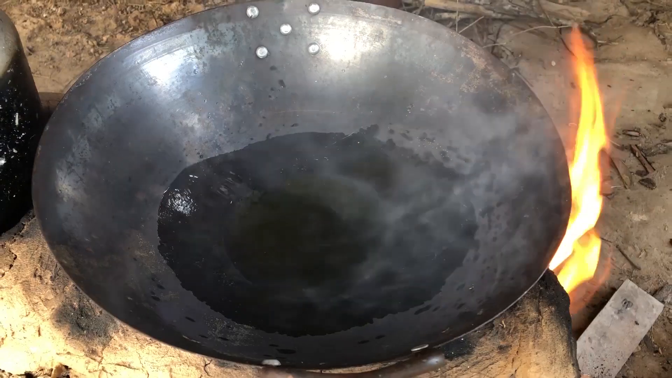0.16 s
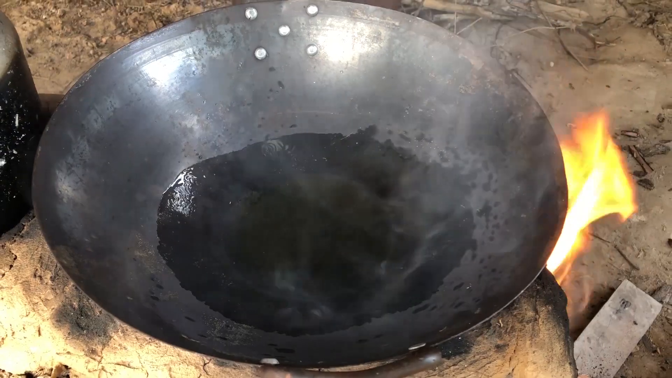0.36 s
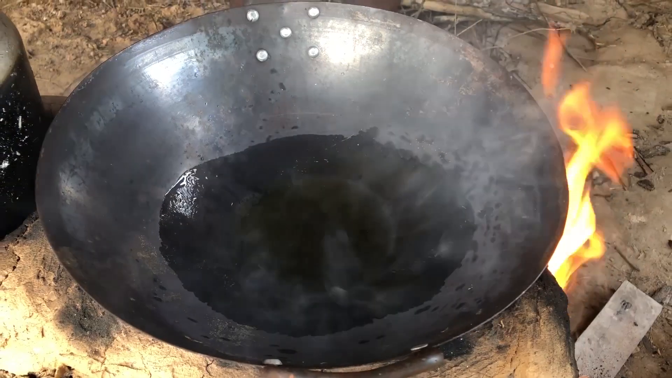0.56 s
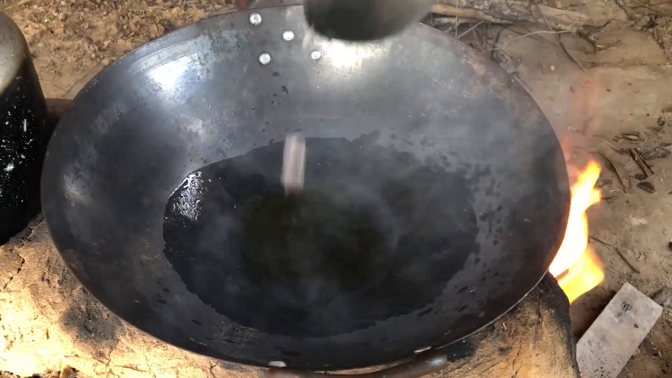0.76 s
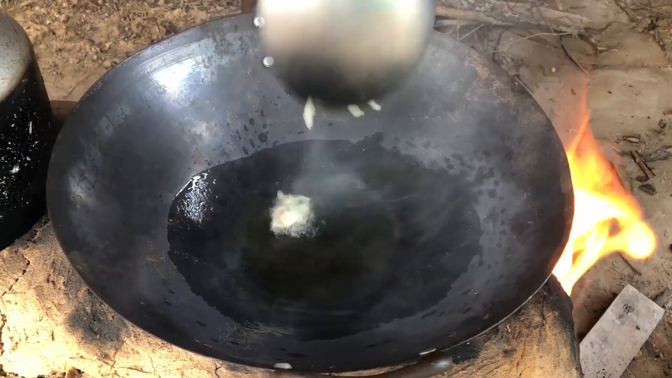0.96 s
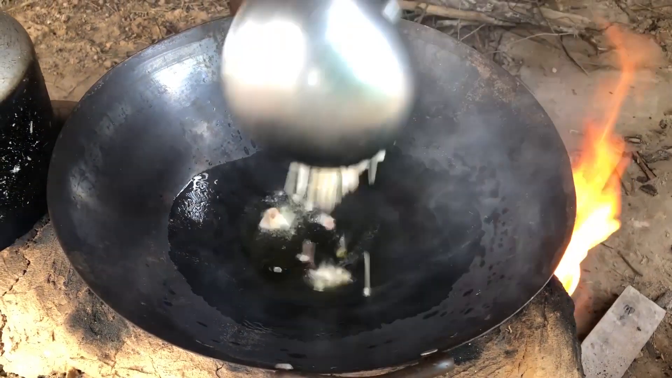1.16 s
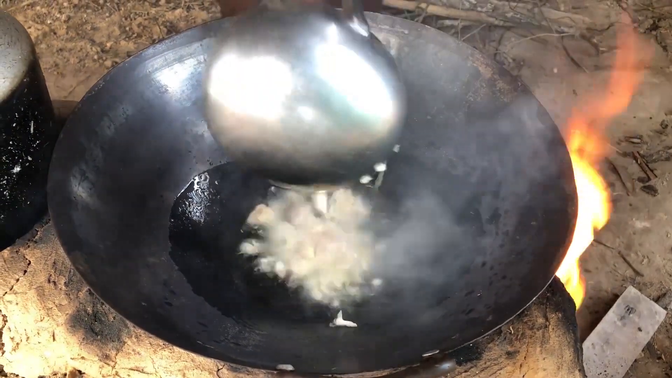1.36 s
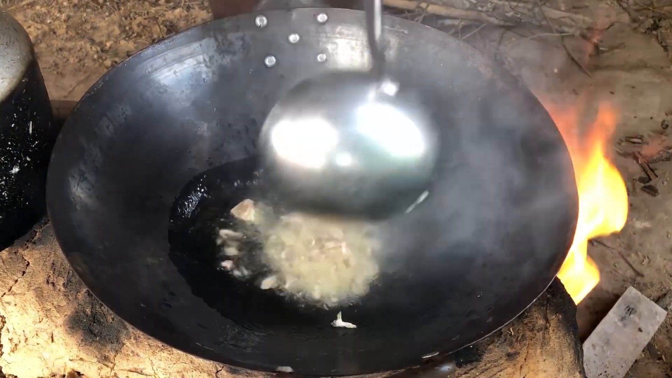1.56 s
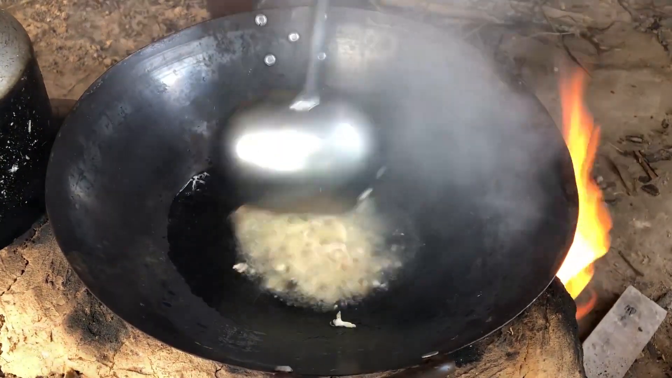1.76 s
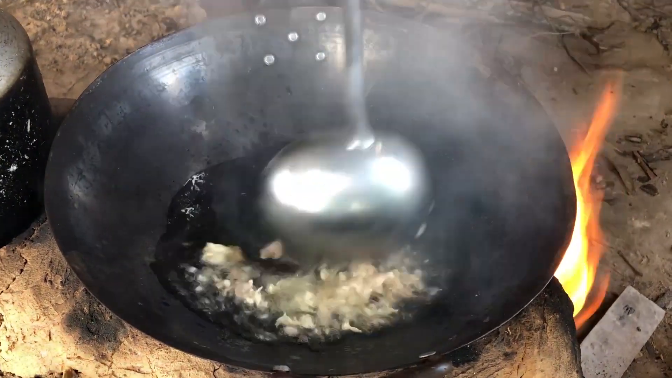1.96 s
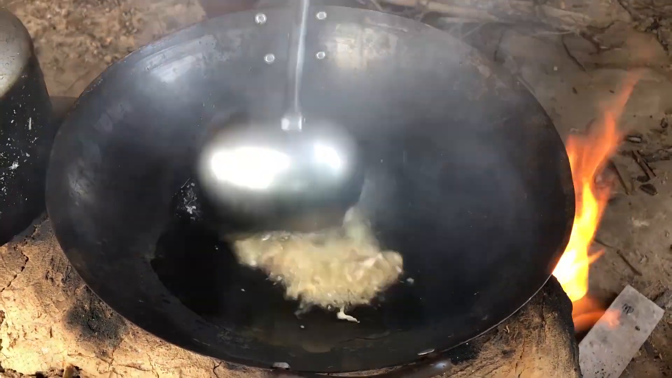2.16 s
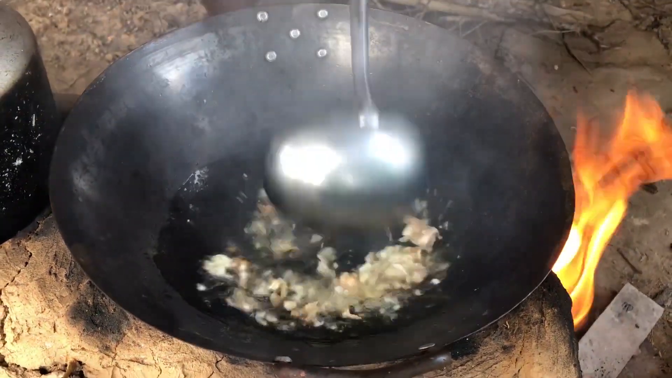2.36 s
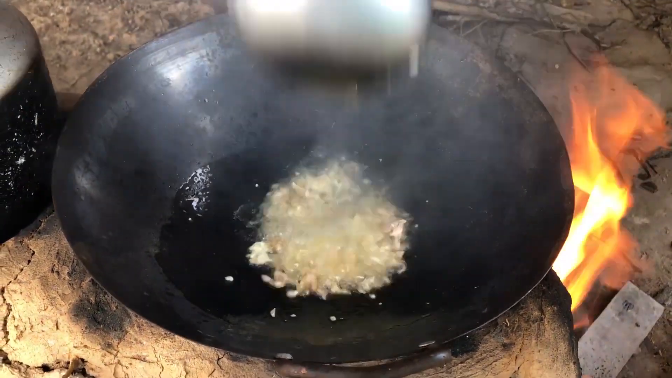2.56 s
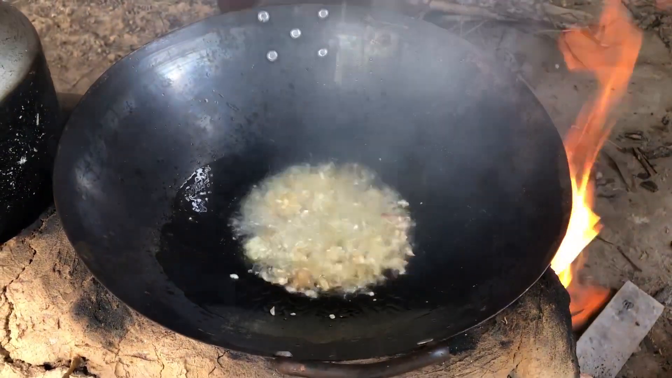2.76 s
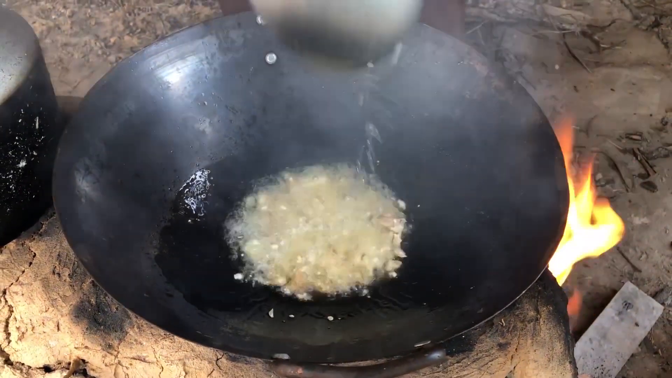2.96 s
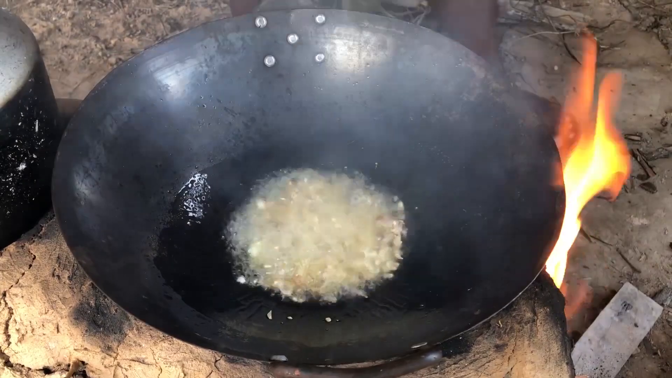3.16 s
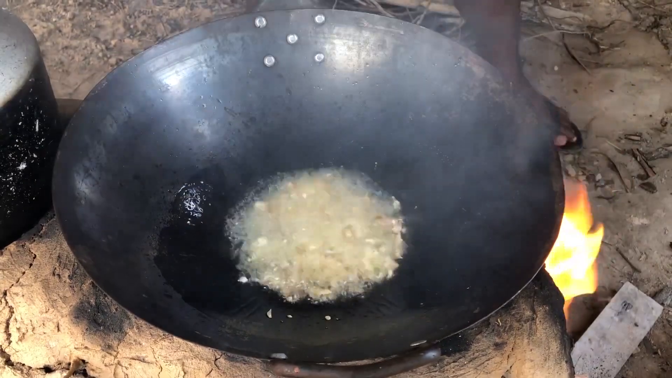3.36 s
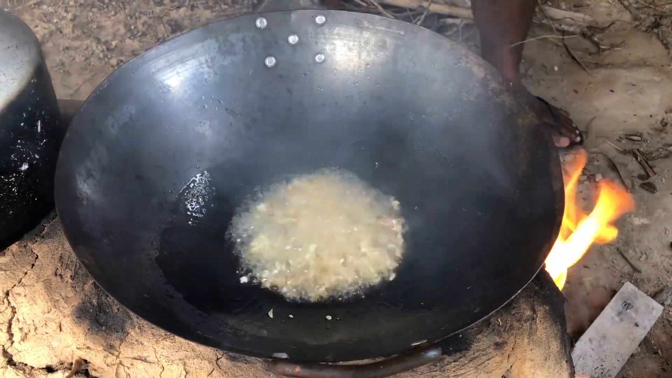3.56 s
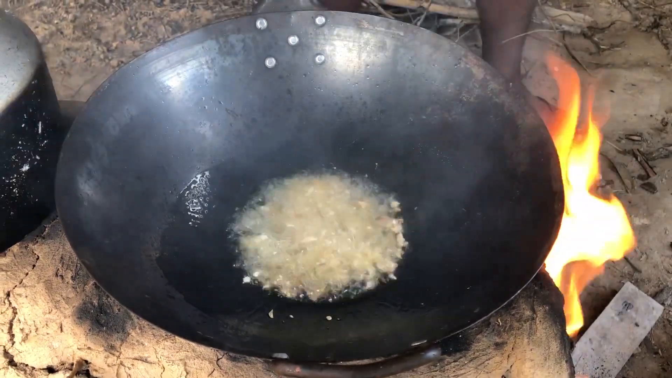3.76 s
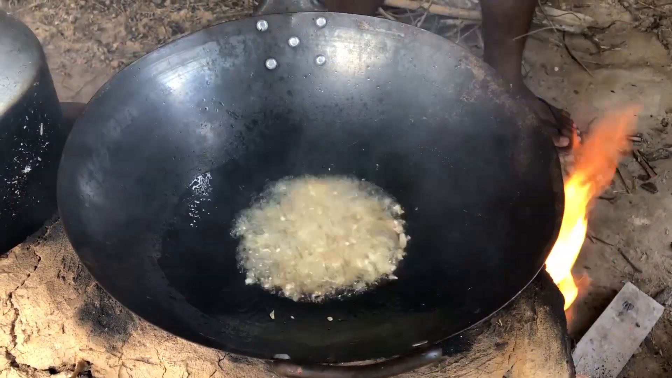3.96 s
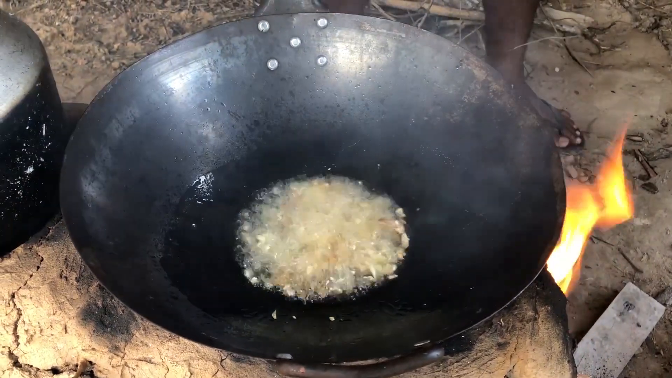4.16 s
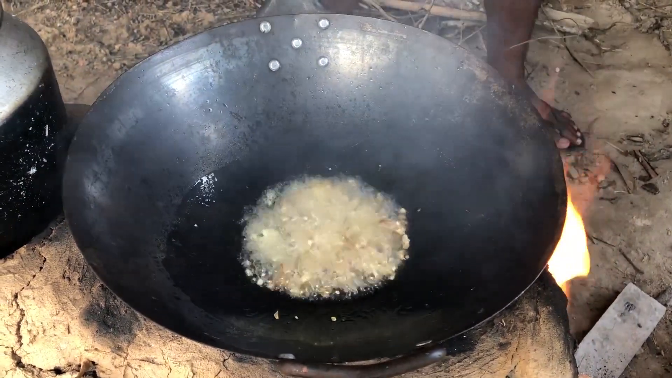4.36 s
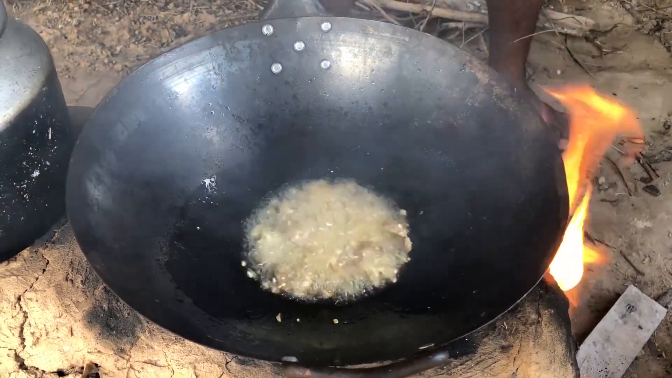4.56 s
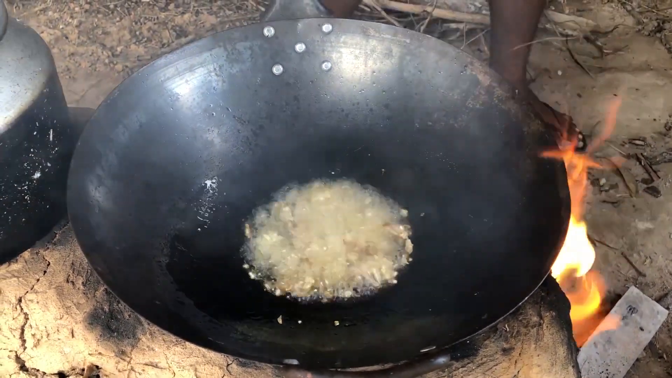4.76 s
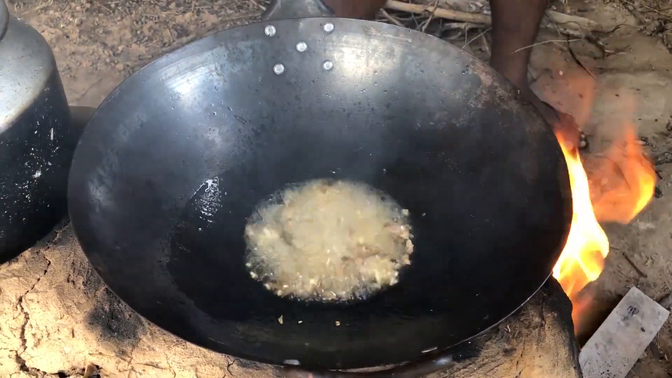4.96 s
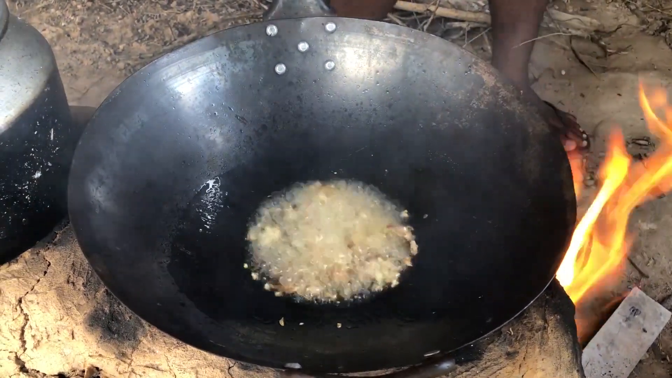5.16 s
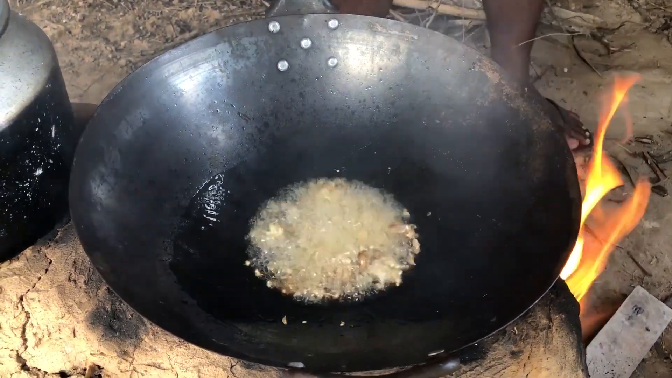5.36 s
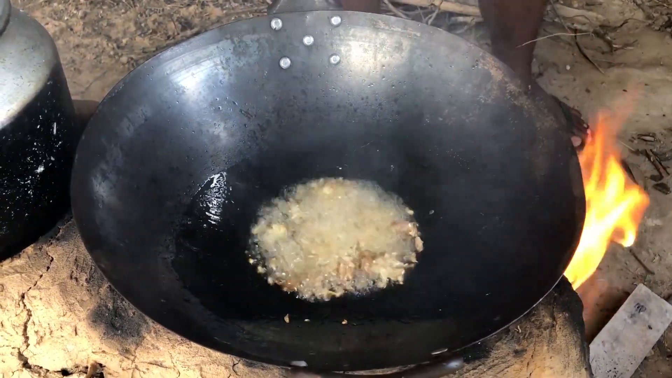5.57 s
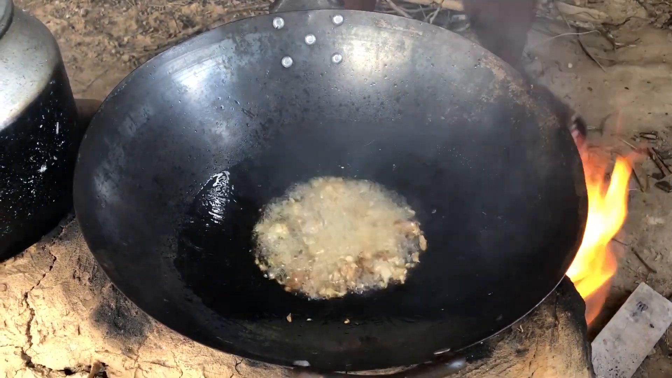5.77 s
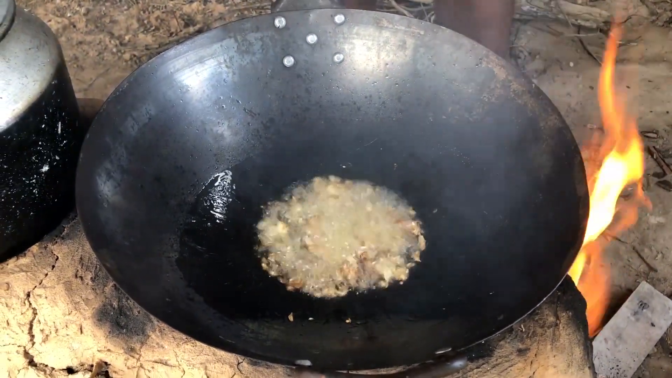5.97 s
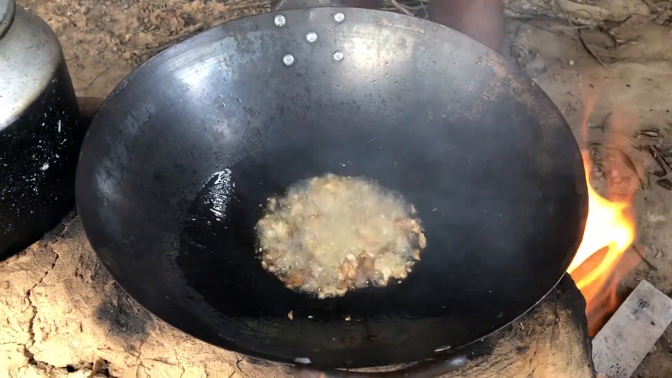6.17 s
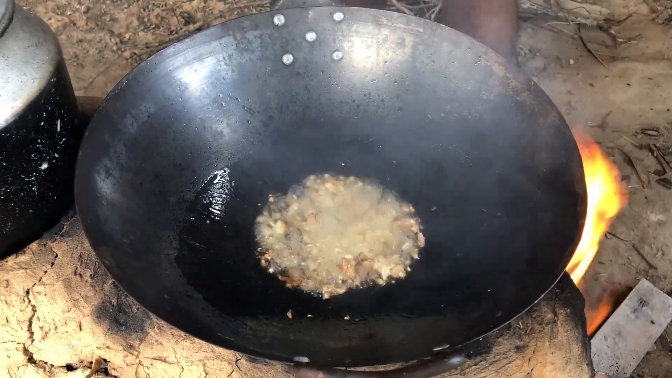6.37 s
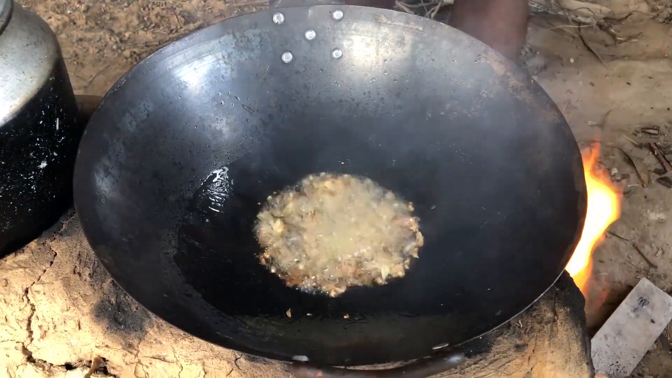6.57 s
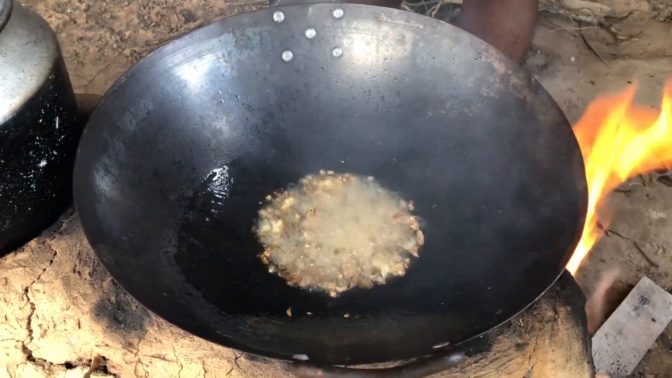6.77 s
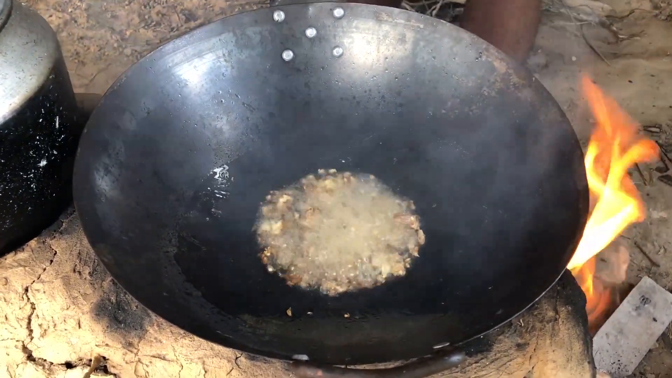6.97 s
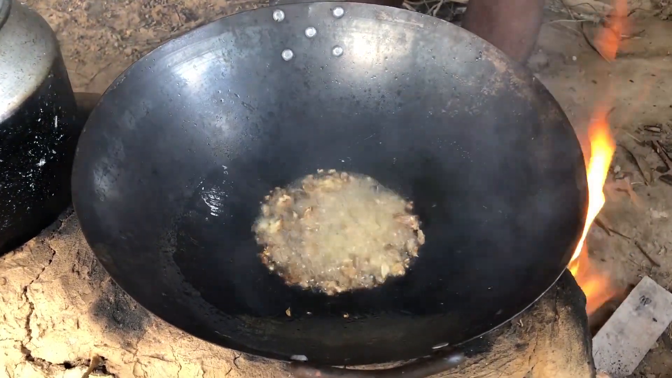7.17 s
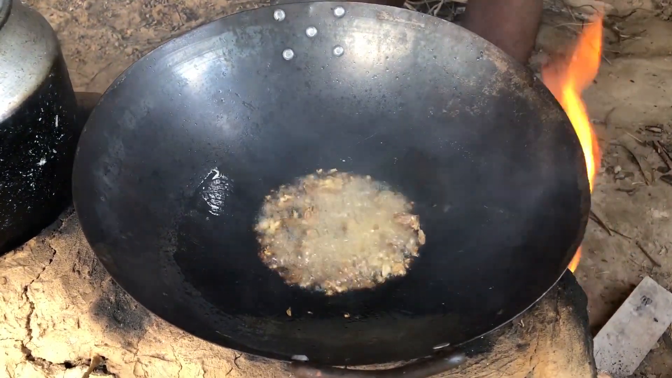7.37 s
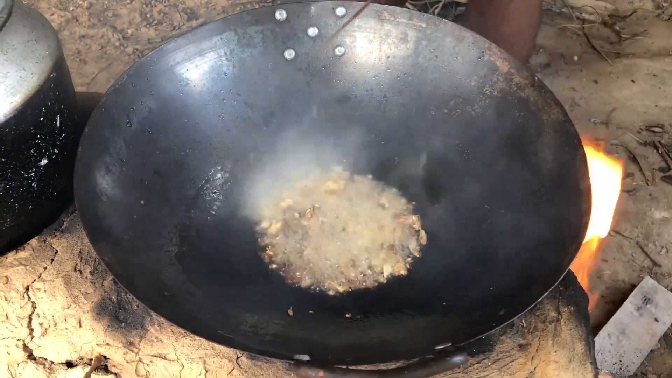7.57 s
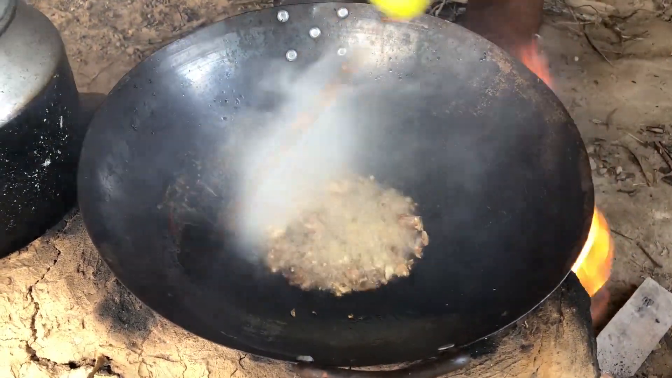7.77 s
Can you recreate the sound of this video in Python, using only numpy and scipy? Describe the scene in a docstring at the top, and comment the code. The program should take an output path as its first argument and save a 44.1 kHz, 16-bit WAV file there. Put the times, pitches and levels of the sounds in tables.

```python
"""Garlic frying in a wok: bursts over steam hiss, in four registers, coloured by oil and bowl.
Tipped from a ladle into hot oil, it flares to a loud sizzle, spits as it is stirred, then simmers with lone pops.
Pops, plops and a ladle thump are falling sweeps; ringing bubbles and low hums are decaying sines.
Shaped noise makes the wood fire, outdoor hush and faint ladle scuffs.
Near the end a few drops fall in, then a splash of liquid roars into steam."""
import sys
import numpy as np
from scipy import signal
from scipy.fft import rfft, irfft
from scipy.io import wavfile

SR = 44100
rng = np.random.default_rng(int(sys.argv[2]) if len(sys.argv) > 2 else 0)


def to_wav(s):
    """Save 16-bit WAV."""
    ch = np.atleast_2d(s).T  # columns
    pcm = np.round(np.clip(ch, -1, 1) * 32767)  # PCM
    wavfile.write(sys.argv[1], SR, pcm.astype(np.int16))


N = 344862
T_S = np.arange(N) / SR
FREQ_HZ = np.maximum(np.arange(N // 2 + 1) * SR / N, 1)

# Spectrum of the open yard. Each row: frequency in Hz, relative level in dB per Hz.
YARD_SPECTRUM = [(100,-1), (250,0.5), (390,-0.5), (560,-1), (1000,-14), (1550,-16), (2200,-20), (5000,-23),
                 (15000,-26)]
# Level of the yard. Each row: time in seconds, level in dB.
YARD_LEVEL = [(0, -67), (.35, -66), (.7, -62.5), (7.82, -66.5)]
# Spectrum of the fire. Each row: frequency in Hz, relative level in dB per Hz.
FIRE_SPECTRUM = [(15,-46), (25,-17), (45,0), (65,2.5), (95,0.5), (145,-8.5), (210,-14.5), (320,-21),
                 (700,-37), (2000,-74)]
# Roar of the fire. Each row: time in seconds, level in dB.
FIRE_LEVEL = [(0, -58), (3.5, -59.5), (6.0, -59), (7.35, -54), (7.82, -65)]
# Ladle brushing the wok before it is tipped. Each row: centre in seconds, level in dB, bell width in seconds.
LADLE_BRUSHES = [(0.632, -71, 0.022), (0.763, -60.5, 0.0066), (0.78, -75, 0.013)]
# Grain of the frying. Each row: time in seconds, bursts per second before clumping, steam hiss in dB re the bursts.
FRYING_GRAIN = [(0, 5900, 2), (1.0, 5100, 9), (1.18, 2300, -3.5), (1.29, 10500, 7.5), (1.6, 5000, 5.5),
                (2.0, 3380, -1), (2.5, 2700, -4), (3.0, 1170, -2.5), (3.7, 1050, 0), (4.4, 1030, 4),
                (5.5, 1000, 8.5), (7.3, 1100, 10.5), (7.53, 1800, -8), (7.6, 12600, 9), (7.82, 17400, 1.5)]
# Spectrum of the frying oil. Each row: frequency in Hz, relative level in dB per Hz.
OIL_SPECTRUM = [(250,-13.5), (450,-15.5), (620,-12.5), (900,-15), (1350,-13), (2200,-6.5), (2900,-4),
                (4000,1.5), (5200,-0.5), (7600,1.5), (11500,2.5), (15500,6)]
# Resonances and dips of the wok's bowl. Each row: centre in Hz, width in Hz, gain in dB.
BOWL_MODES = [(667, 86, 1), (880, 250, -4), (904, 12, 5), (1077, 49, 4.5), (1507, 8.7, 4.5),
              (2380, 260, -2.5), (2430, 42, 7), (2700, 86, 3), (2970, 380, 3.5), (4300, 480, 0.5),
              (15500, 1500, 1)]
# Lower edges of the four frying registers, in Hz; the last is open at the top.
REGISTER_LOWER_EDGES_HZ = [280, 1000, 2400, 8500]
# Registers, in order gurgle, sputter, sizzle, fizz. Each row: level in dB re a brisk sizzle,
# extra dB per dB of vigour, share of the coarseness, share of the extra fizz.
FRYING_REGISTERS = [(-20, 0.24, 1.03, 0.24), (-11, 0, 1.06, 0.38), (0, 0, 0, 0.11), (1.5, 0.3, 0.15, 1.0)]
# Steady frying: hard while the garlic is wet, coarser as it dries.
# Each row: time in seconds, sizzle level in dB, coarseness in dB.
FRYING_VIGOUR = [(0.91, -42.5, 4.5), (1.235, -43.5, -6.5), (1.282, -27, -10), (1.48, -26, -3),
                 (1.676, -30.5, 1.9), (2.45, -28.5, -4.5), (2.9, -35, -1), (3.35, -38.5, 0.6),
                 (3.82, -46, 6.5), (4.24, -46, 6.5), (4.67, -47.5, 5.5), (6.6, -47.5, 5), (7.1, -47.5, 4),
                 (7.4, -48, -0.5)]
# Flares as wet food meets hot metal: first bits, rest of the ladleful, ladle strokes, drips from the
# raised ladle, drops and spray ahead of the pour, then the pour, which boils on.
# Each row: start in seconds, attack in seconds, hold in seconds, fade in dB per second,
# sizzle level in dB, coarseness in dB, extra fizz in dB.
FRYING_FLARES = [(0.902, 0.0073, .002, 287, -36.5, -16, 7), (0.911, .009, .004, 76, -31, -6, -13),
                 (1.044, .026, 0.077, 94, -48, -6, 8), (1.326, 0.026, .01, 117, -25, -8.5, 6.5),
                 (1.83, .026, 0.016, 62, -29, 7, 0), (1.921, 0.056, 0.083, 176, -28.5, 5.5, 1),
                 (2.064, .02, 0.111, 220, -26, -6, 3), (2.265, 0.021, 0.16, 287, -31.5, 9, -2),
                 (2.478, 0.034, 0.038, 270, -37.5, 1.5, 15), (2.595, 0.014, 0.15, 86, -37, 9.5, -1.2),
                 (3.188, .012, .007, 150, -33.5, -1, 5.5), (3.25, 0.0091, .016, 47, -35.5, 0, 4),
                 (7.283, .027, 0.19, 94, -51.5, 6.5, -0.5), (7.472, 0.031, 0.024, 140, -37, 2.5, 1),
                 (7.573, 0.044, 0.051, 208, -24, 7.5, 2.5), (7.647, 0.094, .09, 50, -24.5, 2.5, 5.5)]
# Brief changes in the sizzle. Each row: centre in seconds, length in seconds, depth in dB (negative: a rise).
SIZZLE_DIPS = [(1.594, 0.0091, 11), (2.086, 0.0079, 13), (2.171, 0.013, 12), (2.381, .009, 5.5),
               (2.474, 0.0055, -4.5), (2.527, 0.012, 9), (2.578, 0.015, 15.5)]
# Loudest pops of water flashing to steam under the oil.
# Each row: centre in seconds, peak in dB, pitch in Hz, spread in octaves.
LOUD_POPS = [(1.0245, -11.5, 4360, 0.87), (1.108, -16, 6240, .45), (1.5632, -5, 6820, 0.98),
             (1.589, -8, 5900, .9), (1.917, -9, 3500, 0.2), (1.9451, -1, 2360, 1), (2.0186, -7, 2700, .8),
             (2.041, -7, 4130, 1.2), (2.0675, -2.5, 3400, 1.3), (2.295, -7.5, 3340, 0.34),
             (2.3432, -8, 2720, 0.91), (2.404, -7.5, 3770, 1.6), (2.5007, -3.5, 5530, 0.61),
             (2.5737, -7.5, 13900, 0.77), (2.594, -6, 5560, 0.73), (2.6677, -3, 5900, 0.92),
             (2.7114, -7.5, 2880, 0.63), (2.7346, -9, 1730, 1.14), (2.7416, -18, 10400, 1),
             (2.7637, -16, 6300, 1.4), (2.8015, -11, 6460, 1.3), (2.833, -8.5, 4100, 1.1),
             (2.9935, -7.5, 12800, 2), (3.065, -8.5, 3530, .75), (3.2578, -9, 14000, 1.8),
             (3.2713, -12, 2800, 1.1), (3.2848, -5, 12600, .9), (3.3325, -4.5, 13000, 1.1),
             (3.4177, -6, 14000, 0.45), (3.4279, -8.5, 14000, 1.5), (3.4524, -9.5, 3530, 0.76),
             (3.493, -9.5, 8000, 0.68), (3.5495, -14, 13900, .6), (3.6222, -16.5, 14000, 0.76),
             (3.7478, -8, 14200, 0.94), (3.7598, -11, 13300, 0.73), (3.8769, -20, 14000, .8),
             (4.0086, -18, 2330, 1.3), (4.177, -18.5, 4400, 0.99), (4.2232, -23.5, 1410, 1.4),
             (4.239, -20.5, 2480, 1.4), (4.2775, -13, 4600, 1.2), (4.4942, -18, 4140, 0.39),
             (4.5302, -19.5, 7350, .35), (4.771, -15.5, 6500, 0.64), (5.0039, -24, 4800, 0.26),
             (5.0613, -14.5, 14000, 1.2), (5.4757, -8.5, 14200, 1.08), (5.5519, -17.5, 2930, 1.25),
             (6.1436, -22, 3300, 0.76), (6.5358, -27, 1550, 0.86), (6.593, -22.5, 2020, 0.64),
             (6.915, -27, 2110, 0.45), (6.956, -16.5, 5240, 0.55), (7.2601, -22, 3500, 1.2),
             (7.311, -11.5, 3030, 0.89), (7.3201, -14, 8400, 1.2), (7.422, -15, 8240, 0.27),
             (7.5115, -7.5, 4530, 0.85), (7.549, -5.5, 5100, 1.2), (7.5713, -3.5, 6530, 0.84)]
# Big drops sinking into the oil, and a low ladle thump at 2.169 s.
# Each row: centre in seconds, peak in dB, pitch in Hz, spread in octaves, falling sweep in ms.
PLOPS_AND_THUMP = [(1.8605, -8, 764, 0.73, 2.34), (1.8595, -4, 4100, 0.51, 1.23),
                   (2.1690, -22.5, 64, 2.1, 4.5), (2.5500, -41, 169, 0.56, 2.2),
                   (3.0380, -23, 1210, 0.94, 1.9), (3.0450, -29.5, 590, 1.3, 1.73),
                   (6.4580, -49, 292, 0.32, 3.5), (6.7002, -22.5, 1070, 1.24, 2.04),
                   (7.4010, -31, 290, 0.51, 1.55)]
# Hums after the drops and, at 2.171 s, after the ladle thump.
# Each row: start in seconds, level in dB, pitch in Hz, rise in Hz per second, t60 in seconds.
LOW_HUMS = [(1.866, -34, 150, 3, 0.17), (1.867, -19.5, 290, 0, 0.046), (2.171, -17, 45.6, -3, 0.041),
            (6.707, -40.5, 207, 500, 0.13), (7.402, -41, 240, 100, 0.23), (7.414, -47, 403, 2000, 0.51)]
# Bubbles that ring as they burst.
# Each row: start in seconds, peak in dB, pitch in Hz, t60 in seconds, scattered tail in dB re the note.
BUBBLE_PINGS = [(2.1824, -4, 2260, 0.0026, -17), (2.437, -13, 3200, 0.0069, -10),
                (2.793, -12, 2940, 0.0016, -25), (2.859, -21, 4300, 0.01, -5),
                (3.1530, -21.5, 5480, 0.012, -14), (3.3100, -16, 4160, 0.0095, -5),
                (3.398, -18, 4530, 0.011, -11), (3.487, -22.5, 4370, 0.01, -4.5),
                (3.558, -20.5, 4300, 0.0076, -17), (3.642, -26, 4530, 0.0099, -4.5),
                (4.0170, -17, 4560, 0.0021, -16), (4.0880, -15.5, 4130, 0.011, -18),
                (4.3000, -28, 4300, 0.011, -5.5), (4.4375, -29, 4530, .016, -6.5),
                (7.4192, -29.5, 2048, 0.026, -26)]
# Liquid boiling up in the splash. Each row: time in seconds, level in dB.
SPLASH_LEVEL = [(7.40, -80), (7.47, -60), (7.575, -50), (7.615, -34), (7.655, -29.5), (7.70, -39),
                (7.82, -35)]

CUTOFF_HZ = 15900
GARLIC_LANDS_S = .908
BRISK_DB = -30   # sizzle level from which vigour and spits are counted
POP_SWEEP_MS = .8
# Lesser spits: rate and mean peak at a brisk sizzle, then dB change of each per dB of sizzle.
SPITS_PER_S, SPIT_PEAK_DB = 26, -15.5
SPIT_RATE_DB_PER_DB, SPIT_PEAK_DB_PER_DB = .7, .75
SPIT_HZ, SPIT_RANGE_OCTAVES, SPIT_SCATTER_DB = 8000, 1.0, 4   # range and scatter are plus or minus
SPIT_DROP_OCTAVES_PER_DB = .07   # coarser frying throws larger, lower spits


def from_db(db):
    """Decibels to amplitude gain."""
    return 10 ** (np.asarray(db) / 20)


def rms_one(x):
    """Scale to unit power."""
    return x / np.sqrt(np.mean(x ** 2) + 1e-20)


def in_time(rows):
    """Interpolate each column of a curve at every sample."""
    time_s, *columns = np.transpose(rows)
    return [np.interp(T_S, time_s, column) for column in columns]


def shaped(x, gain):
    """Filter by a gain for each frequency."""
    return irfft(rfft(x) * gain, N)


def shaped_noise(gain):
    """Noise of unit power with the given spectrum."""
    return rms_one(shaped(rng.standard_normal(N), gain))


def colour(points):
    """Gain for each frequency, interpolated in dB over log frequency."""
    hz, db = np.transpose(points)
    return from_db(np.interp(np.log(FREQ_HZ), np.log(hz), db))


def hump(hz, centre_hz, octaves):
    """Bell-shaped gain on the octave scale."""
    return np.exp(-.5 * (np.log2(hz / centre_hz) / octaves) ** 2)


def drift(rate_hz):
    """Slow random wander with spread 1."""
    return shaped_noise(1 / (1 + (FREQ_HZ / rate_hz) ** 2))


def add(out, start_s, sound):
    """Mix a sound in from a start time."""
    at = int(round(start_s * SR))
    out[at:at + len(sound)] += sound[:N - at]


def burst(hz, octaves, sweep_ms, size):
    """A click falling in pitch, as from a swelling steam bubble; it passes hz at the middle sample, peak 1."""
    f_hz = np.maximum(np.arange(size // 2 + 1) * SR / size, 1)
    f_khz, centre_khz = f_hz / 1000, hz / 1000
    # slope of the phase is the delay: sweep_ms * (1/sqrt(f) - 1/sqrt(centre)), in kHz
    cycles = sweep_ms * (2 * np.sqrt(f_khz) - f_khz / np.sqrt(centre_khz))
    gain = hump(f_hz, hz, octaves) / (1 + (f_hz / CUTOFF_HZ) ** 20)
    phase = np.exp(-2j * np.pi * (cycles + rng.random()))
    wave = np.roll(irfft(gain * phase), size // 2)
    return wave / np.abs(wave).max()


def bursts(rows, size):
    """Single bursts, each centred on its time."""
    out = np.zeros(N)
    for centre_s, db, hz, octaves, sweep_ms in rows:
        add(out, centre_s - size / 2 / SR, from_db(db) * burst(hz, octaves, sweep_ms, size))
    return out


def yard():
    """Steady outdoor hush: coloured noise."""
    level_db, = in_time(YARD_LEVEL)
    return shaped_noise(colour(YARD_SPECTRUM)) * from_db(level_db)


def fire(flicker_db=1.4):
    """Flames rumble and flutter under the wok: low noise with a wandering level."""
    level_db, = in_time(FIRE_LEVEL)
    return shaped_noise(colour(FIRE_SPECTRUM)) * from_db(level_db + flicker_db * drift(10.0))


def brushes(centre_hz=2200, octaves=0.75):
    """Faint scuffs of metal: band noise under bell-shaped swells."""
    touch = np.zeros(N)
    for centre_s, db, width_s in LADLE_BRUSHES:
        touch += from_db(db) * np.exp(-.5 * ((T_S - centre_s) / width_s) ** 2)
    return touch * shaped_noise(hump(FREQ_HZ, centre_hz, octaves))


def registers():
    """Level in dB of gurgle, sputter, sizzle and fizz: power of the steady frying plus every flare."""
    vigour_db, coarse_db = in_time(FRYING_VIGOUR)
    register_db, follows, coarse_share, fizz_share = np.transpose(FRYING_REGISTERS)[:, :, None]
    # hard frying is brighter: fizz gains on the sizzle
    steady_db = vigour_db + follows * (vigour_db - BRISK_DB) + coarse_share * coarse_db
    power = from_db(steady_db) ** 2
    for start_s, attack_s, hold_s, fade_db_per_s, db, flare_coarse_db, fizz_db in FRYING_FLARES:
        since_s = T_S - start_s
        fading_s = np.clip(since_s - attack_s - hold_s, 0, 2)
        swell = np.clip(since_s / attack_s, 0, 1) * from_db(-fade_db_per_s * fading_s)
        flare_db = db + coarse_share * flare_coarse_db + fizz_share * fizz_db
        power = power + (swell * from_db(flare_db)) ** 2
    return 10 * np.log10(power) + register_db


def crackle(per_s, low_size_db=3.0, high_size_db=6.0, largest=4.67, clump_db=3.0, octaves=0.62,
            sweep_ms=1.0, count=14):
    """Countless small bursts in clumps, dealt to pitches from large, even bubbles to tiny, uneven ones."""
    born = rng.random(N) < per_s * from_db(clump_db * drift(40)) / SR
    luck = np.minimum(rng.exponential(1, N), largest)
    push = rng.choice([-1, 1], N) / np.sqrt(per_s)   # power does not follow the rate
    dealt = (count * np.sqrt(rng.random(N))).astype(int)   # small bubbles are the commonest
    pitches_hz = np.geomspace(450, 17000, count)
    sizes_db = np.linspace(low_size_db, high_size_db, count)
    out = np.zeros(N)
    for k, (hz, size_db) in enumerate(zip(pitches_hz, sizes_db)):
        at = born & (dealt == k)
        clicks = np.zeros(N)
        clicks[at] = push[at] * from_db(size_db * luck[at])
        wave = burst(hz, octaves, sweep_ms, size=1024)
        wave = wave / np.abs(rfft(wave)).max()
        out += signal.oaconvolve(rms_one(clicks), wave, "same")
    return rms_one(out)


def frying(flutter_db=0.97, own_flutter_db=0.5):
    """Bursts over steam hiss, coloured by oil and bowl; each register has its own level and flutter."""
    per_s, hiss_db = in_time(FRYING_GRAIN)
    hiss = from_db(hiss_db)
    source = (crackle(per_s) + hiss * rng.standard_normal(N)) / np.sqrt(1 + hiss ** 2)
    bowl_db = sum(db / (1 + (2 * (FREQ_HZ - hz) / width_hz) ** 2) for hz, width_hz, db in BOWL_MODES)
    tone = colour(OIL_SPECTRUM) * from_db(bowl_db)
    above = [1 / (1 + (edge_hz / FREQ_HZ) ** 6) for edge_hz in REGISTER_LOWER_EDGES_HZ] + [0]
    out = np.zeros(N)
    for k, level_db in enumerate(registers()):
        register = rms_one(shaped(source, tone * (above[k] - above[k + 1])))
        out += register * from_db(level_db + own_flutter_db * drift(38))
    return out * from_db(flutter_db * drift(75))


def presence(swell_s=0.0044):
    """Gain of the sizzle: none until the garlic lands, then full with brief dips and a rise."""
    dips_db = np.zeros(N)
    for centre_s, length_s, depth_db in SIZZLE_DIPS:
        offset = np.abs(2 * (T_S - centre_s) / length_s).clip(0, 10)
        dips_db += depth_db * np.exp(-offset ** 4)
    return np.clip((T_S - GARLIC_LANDS_S) / swell_s, 0, 1) * from_db(-dips_db)


def lesser_spits(octaves=0.62, sweep_ms=1.0, count=400):
    """Burst rows for random spits, oftener and louder the harder the garlic fries."""
    _, _, sizzle_db, _ = registers()
    _, coarse_db = in_time(FRYING_VIGOUR)
    chance = rng.random((count, 4))
    slot_s = (T_S[-1] - GARLIC_LANDS_S) / count   # at most one spit per slot
    centre_s = GARLIC_LANDS_S + slot_s * (np.arange(count) + chance[:, 0])
    over_db = np.interp(centre_s, T_S, sizzle_db) - BRISK_DB
    per_s = SPITS_PER_S * from_db(SPIT_RATE_DB_PER_DB * over_db)
    happens = chance[:, 1] < per_s * slot_s
    db = SPIT_PEAK_DB + SPIT_PEAK_DB_PER_DB * over_db + SPIT_SCATTER_DB * (2 * chance[:, 2] - 1)
    drop_octaves = SPIT_DROP_OCTAVES_PER_DB * np.interp(centre_s, T_S, coarse_db)
    hz = SPIT_HZ * 2 ** (SPIT_RANGE_OCTAVES * (2 * chance[:, 3] - 1) - drop_octaves)
    spits = np.column_stack([centre_s, db, hz])[happens]
    return [(*spit, octaves, sweep_ms) for spit in spits]


def pops():
    """Water flashes to steam under the oil: the loud pops and the lesser spits, as falling bursts."""
    loud = [(*pop, POP_SWEEP_MS) for pop in LOUD_POPS]
    return bursts(loud + lesser_spits(), size=1024)


def plops_and_thump():
    """Big drops sink into the oil and the ladle thumps once: longer, mostly lower falling bursts."""
    return bursts(PLOPS_AND_THUMP, size=8192)


def hums(rise_s=0.0025):
    """Decaying sines after the drops and the thump; most climb in pitch, the thump's falls slightly."""
    out, t_s = np.zeros(N), T_S[:SR // 4]
    for start_s, db, hz, climb_hz_per_s, t60_s in LOW_HUMS:
        hum = np.sin(2 * np.pi * (hz + climb_hz_per_s * t_s / 2) * t_s)
        add(out, start_s, hum * from_db(db - 60 * t_s / t60_s) * (1 - np.exp(-t_s / rise_s)))
    return out


def pings(tail_t60_s=0.097, rise_s=.0007, tail_octaves=.16):
    """A bubble rings for a moment and its note scatters round the bowl as a band-noise tail."""
    out, t_s = np.zeros(N), T_S[:SR // 5]
    size = len(t_s)
    f_hz = np.maximum(np.arange(size // 2 + 1) * SR / size, 1)
    for start_s, db, hz, t60_s, tail_db in BUBBLE_PINGS:
        envelope = from_db(-60 * t_s / t60_s) * (1 - np.exp(-(t_s / rise_s) ** 2))
        note = np.sin(2 * np.pi * hz * t_s) * envelope
        note = note / np.abs(note).max()
        scatter = rms_one(irfft(rfft(rng.standard_normal(size)) * hump(f_hz, hz, tail_octaves), size))
        tail = scatter * from_db(tail_db - 60 * t_s / tail_t60_s)
        add(out, start_s, from_db(db) * (note + tail))
    return out


def splash(per_s=1500, centre_hz=1020, octaves=0.45):
    """Poured liquid boils in larger bubbles than the garlic does: random impulses in a low band."""
    level_db, = in_time(SPLASH_LEVEL)
    bubbles = (rng.random(N) < per_s / SR) * rng.standard_normal(N)
    return rms_one(shaped(bubbles, hump(FREQ_HZ, centre_hz, octaves))) * from_db(level_db)


def reflections(x, wet_db, t60_s):
    """Brief scatter from the wok's wall and the ground: convolution with decaying noise."""
    t_s = T_S[:SR // 8]
    echo = rng.standard_normal(len(t_s)) * from_db(-60 * t_s / t60_s) * (t_s > .001)
    echo = echo / np.sqrt(np.sum(echo ** 2))
    return from_db(wet_db) * signal.oaconvolve(x, echo)[:N]


def scene():
    """The wok over the fire, heard from close above."""
    background = yard() + fire() + brushes()
    sizzle = frying()
    sizzle = presence() * (sizzle + reflections(sizzle, wet_db=-14, t60_s=.06))
    hits = pops() + plops_and_thump()
    hits = hits + reflections(hits, wet_db=-13.0, t60_s=0.15)
    return (background + sizzle + hits + hums() + pings() + splash())[None]


def record(dry):
    """The highest peaks are rounded and the top is cut."""
    top = .65
    low_pass = signal.ellip(12, .2, 80, CUTOFF_HZ, fs=SR, output="sos")
    return signal.sosfilt(low_pass, top * np.tanh(dry / top))


dry = scene()
out = record(dry)
to_wav(out)
```